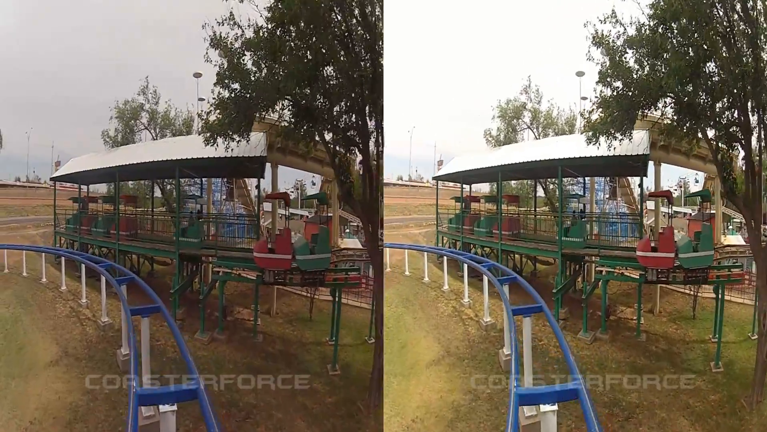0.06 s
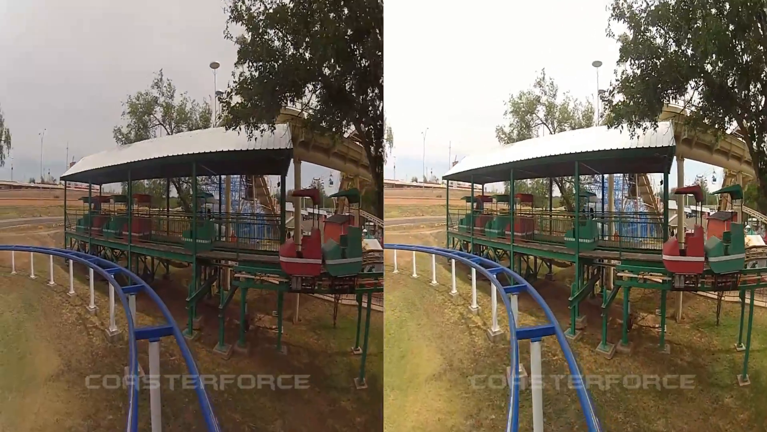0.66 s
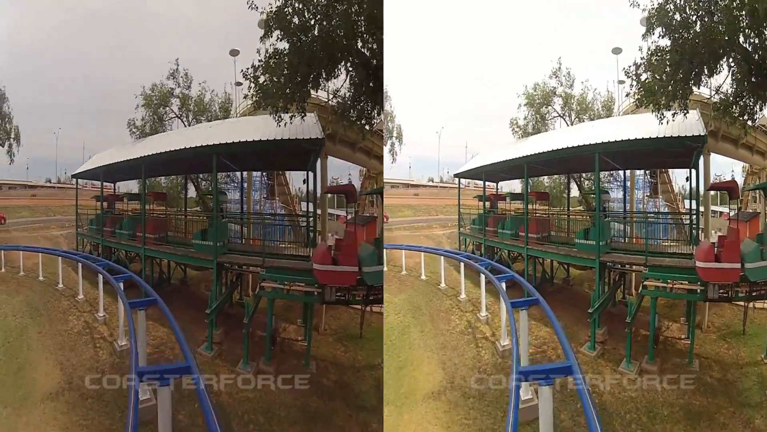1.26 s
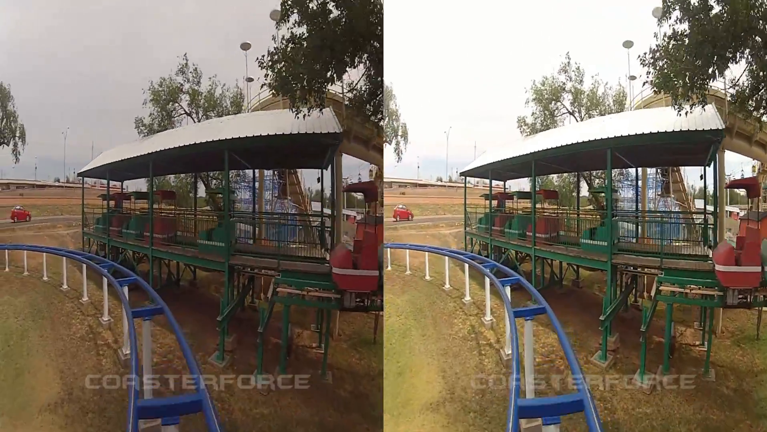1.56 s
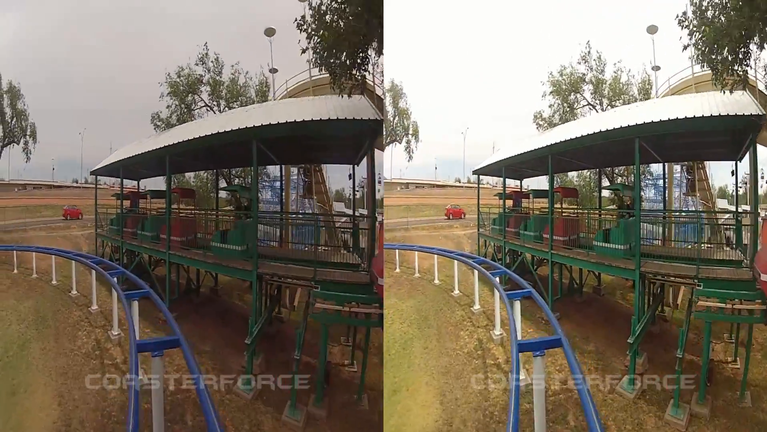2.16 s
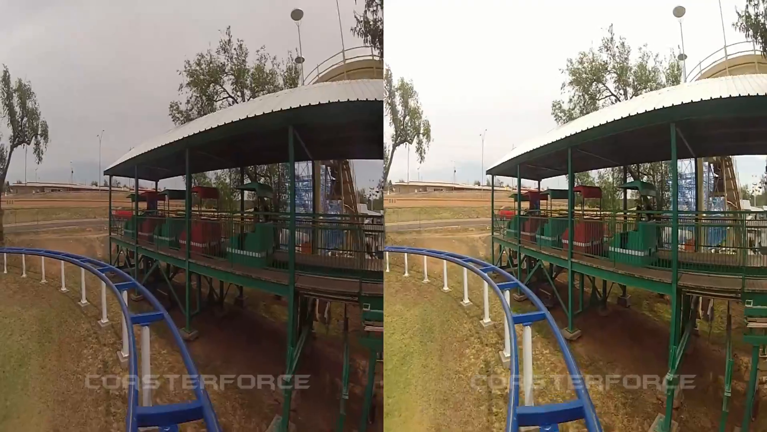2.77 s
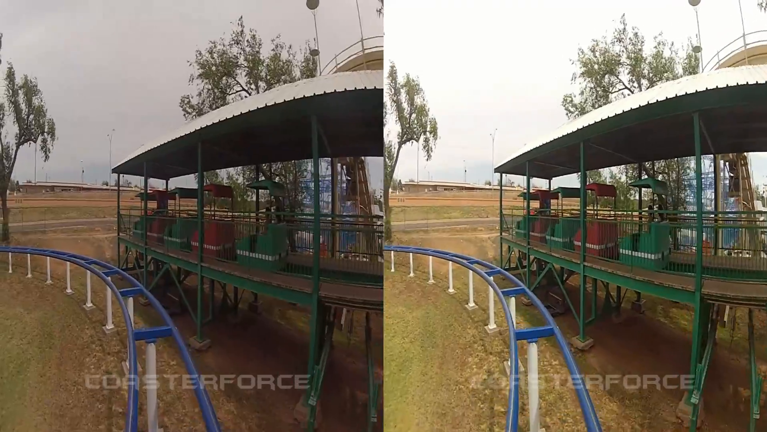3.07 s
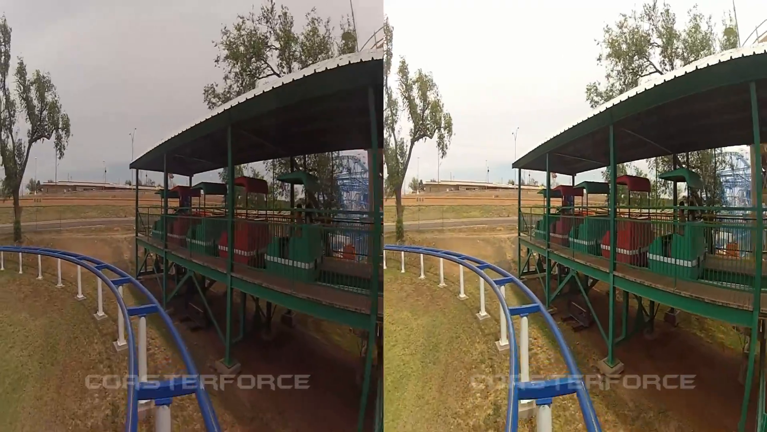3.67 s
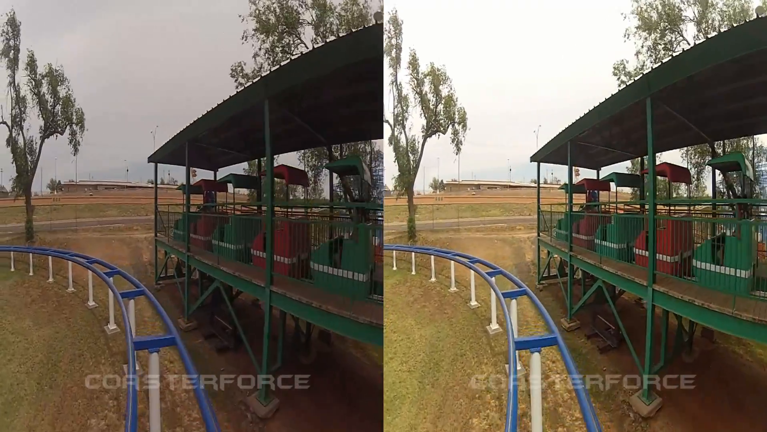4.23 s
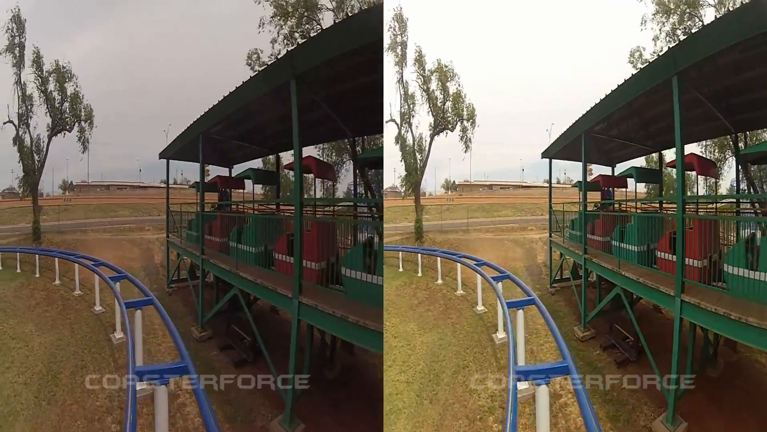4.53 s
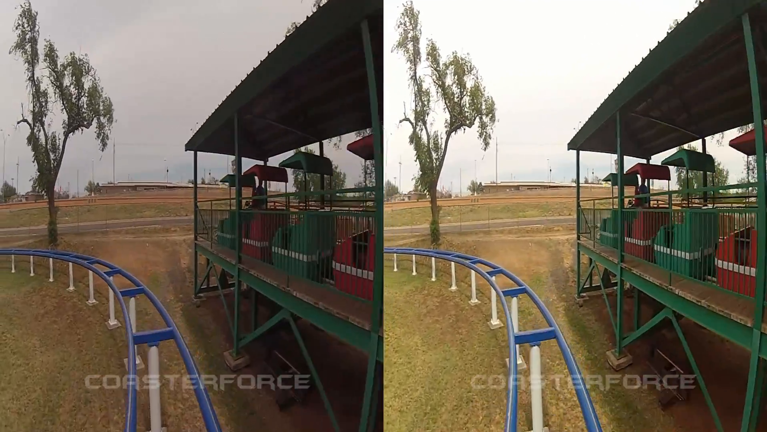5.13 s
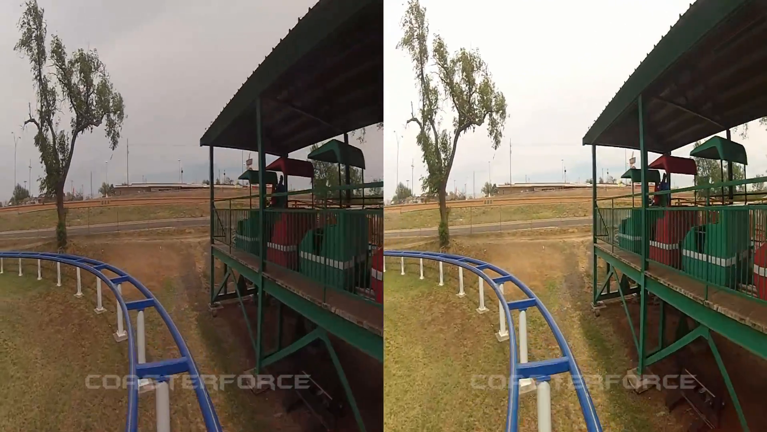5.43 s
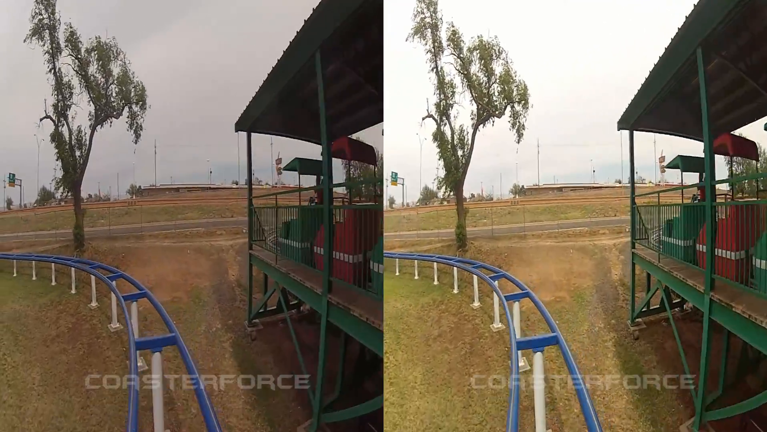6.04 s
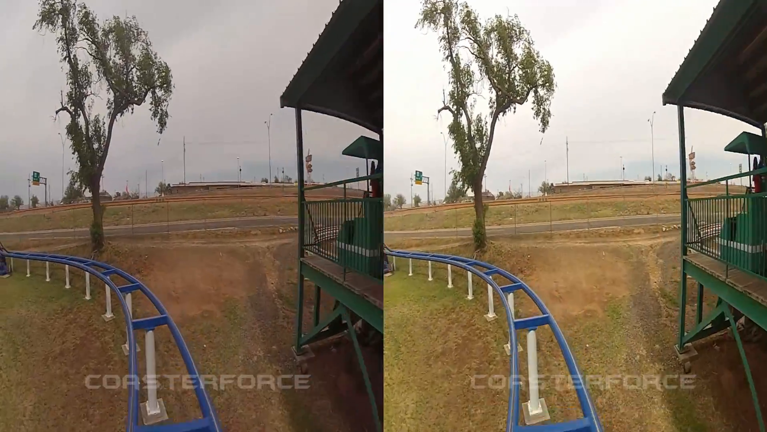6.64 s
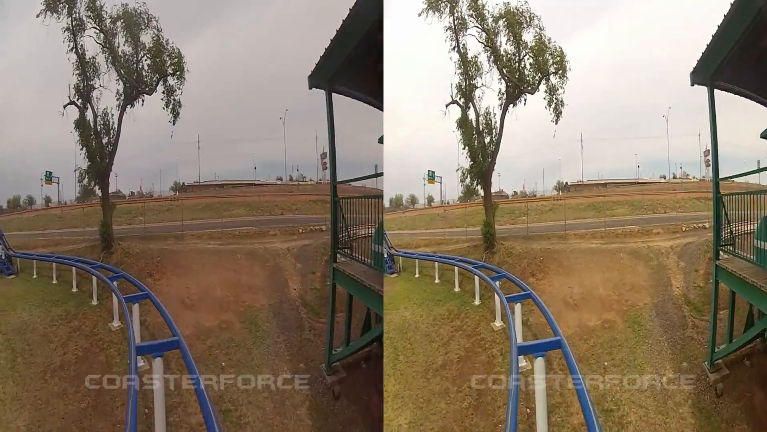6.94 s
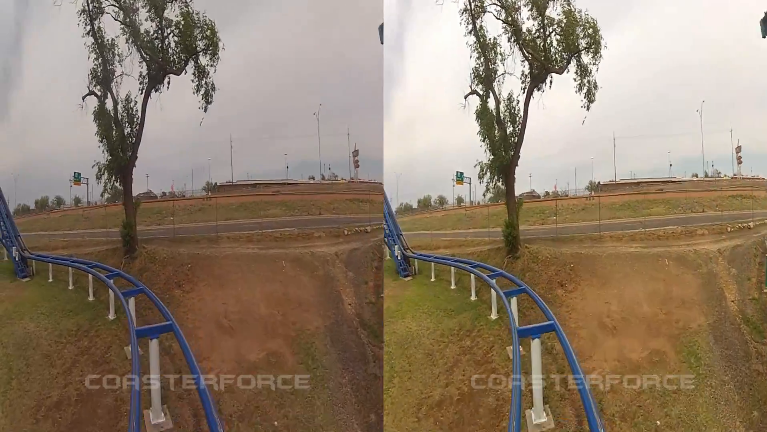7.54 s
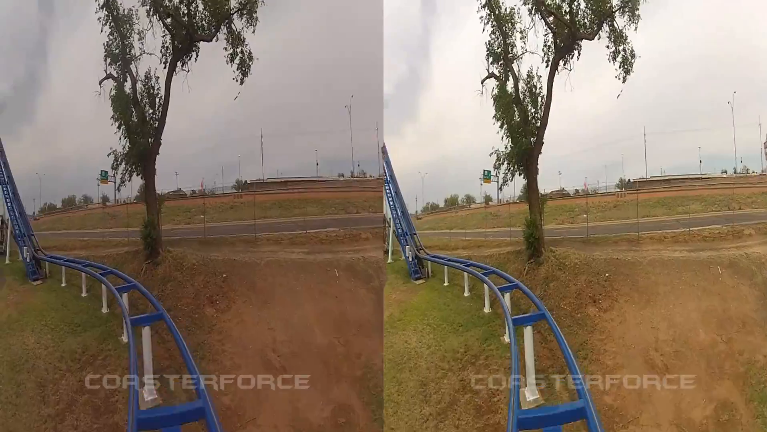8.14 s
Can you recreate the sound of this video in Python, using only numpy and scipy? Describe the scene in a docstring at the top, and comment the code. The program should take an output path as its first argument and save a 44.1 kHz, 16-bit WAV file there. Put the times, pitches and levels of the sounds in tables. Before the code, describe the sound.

A small roller coaster rounds a bend on steel track outdoors, heard from its front car. It begins with a low, subdued rumble and light, quick wheel taps. After about two seconds it runs harder and louder: the wheels roar and rasp in surges, one squeals faintly for a moment, and a loose fitting chatters in short clacks. The bumpy rumble carries on to the end, with a few sharp ticks and a thin fizz.

```python
"""Roller coaster in a bend

A small train rounds steel track, heard from its front car. The wheels drive the car's low modes and the
roar, rasp and hiss of the rails; bearings whir, and wheel carriers tap while the train is slow.
From 2 s it runs harder: a flange sings faintly and a loose fitting chatters in short clacks.
Overload flattens peaks, dropouts tick and timing jitter adds a thin fizz."""
import sys
import numpy as np
from scipy import signal
from scipy.fft import rfft, irfft
from scipy.io import wavfile
from scipy.ndimage import uniform_filter1d

SR = 44100
rng = np.random.default_rng(int(sys.argv[2]) if len(sys.argv) > 2 else 0)


def master_out(mix):
    """Clip the mix to full scale and print it as 16-bit PCM to the path in sys.argv[1]."""
    frames = np.transpose(np.atleast_2d(mix))
    ceiling = np.clip(frames, -1, 1)
    pcm = np.round(ceiling * 32767).astype(np.int16)
    wavfile.write(sys.argv[1], SR, pcm)


N = 370440
CEILING_DB = -1.95


def amp(db):
    """Gain from dB."""
    return 10 ** (np.asarray(db) / 20)


def unit_rms(x):
    """Scale to rms 1."""
    return x / np.sqrt(np.mean(x ** 2) + 1e-20)


def bin_hz():
    """FFT bin frequencies."""
    return np.fft.rfftfreq(N, 1 / SR)


def spectrum(points):
    """Gain per bin through points of f/Hz, level/dB."""
    hz, db = np.transpose(points)
    return amp(np.interp(np.log(bin_hz() + 1), np.log(hz), db))


def modes(rows):
    """Gain per bin of steep-sided resonances: f/Hz, width/Hz, level/dB."""
    f = bin_hz()
    return np.sqrt(sum(amp(db) ** 2 / (1 + 2 * ((f - hz) / width) ** 2) ** 2 for hz, width, db in rows))


def band(lo_hz, hi_hz):
    """Gain per bin of a steep band-pass."""
    f = bin_hz() + 1
    return 1 / np.sqrt((1 + (lo_hz / f) ** 20) * (1 + (f / hi_hz) ** 20))


def noise(gain):
    """Unit-rms noise shaped by a gain per bin."""
    return unit_rms(irfft(gain * rfft(rng.standard_normal(N)), N))


def steadied(x, window_s):
    """Hold the slow level at 1; keep the quick beating."""
    size = max(int(window_s * SR), 2)
    power = uniform_filter1d(uniform_filter1d(x ** 2, size), size)
    return x / np.sqrt(abs(power) + 1e-9)


def add(mix, start_s, sound):
    """Mix a sound in at start_s."""
    part = mix[max(round(start_s * SR), 0):][:len(sound)]
    part += sound[:len(part)]


def swell(centre_s, length_s):
    """Hann pulse, 0 to 1 and back."""
    out, size = np.zeros(N), max(int(length_s * SR), 3)
    start = round(centre_s * SR) - size // 2
    add(out, start / SR, np.hanning(size)[max(-start, 0):])
    return out


# Wheel load on the rails: t/s, level/dB
WHEEL_LOAD = [(0, -15.5), (0.55, -16), (0.85, -12), (1.55, -9.0), (1.88, -13), (2.02, -3.5), (2.45, -4.5),
              (2.83, -6), (3.2, -4.0), (4.0, -3), (4.55, -0.5), (5.6, -0.5), (6.7, 0), (7.0, 2.5),
              (7.5, -0.5), (8.4, -1)]


def load_db():
    """The wheels bear harder as the run goes on."""
    return np.interp(np.arange(N) / SR, *np.transpose(WHEEL_LOAD))


# Rough stretches of rail: centre t/s, length/s, rise/dB
ROUGH_RAIL = [(0.12, 0.18, 7), (2.15, 0.13, 5), (2.338, 0.27, 5.5), (2.538, 0.079, 2.5), (2.682, 0.25, 6.0),
              (2.909, 0.12, 9.0), (2.978, 0.17, 11.0), (3.118, 0.2, 8), (3.3, 0.14, 7), (3.366, 0.1, 4),
              (3.52, 0.14, 7.5), (3.648, 0.051, 6), (3.724, 0.034, 9.5), (3.83, 0.16, 5),
              (3.926, 0.096, 10.5), (4.17, 0.2, 5.5), (4.341, 0.049, 4.5), (4.46, 0.5, 3.5),
              (4.628, 0.05, 6), (4.982, 0.19, 4.0), (5.19, 0.21, 3.0), (5.384, 0.05, 3.5),
              (6.21, 0.072, 7.5), (6.846, 0.21, 2.5), (7.11, 0.07, 3.5), (7.667, 0.063, 9),
              (7.719, 0.087, 10.5), (7.803, 0.058, 9), (7.967, 0.21, 2.5), (8.37, 0.17, 3)]


def roughness_db():
    """Rough rail briefly makes the wheels grind louder."""
    return sum(db * swell(s, length_s) for s, length_s, db in ROUGH_RAIL)


# Modes of the car on the track: f/Hz, width/Hz, relative level/dB
CAR_MODES = [(24, 5.9, -23.5), (45.3, 5.1, -1.5), (69.9, 7.9, 4), (80.6, 8.8, 2), (107, 15, -15.5),
             (113.6, 13, 2), (141.9, 10, 2), (171.8, 12, -4), (188.3, 18, -6), (213.5, 11, -3.5),
             (227.8, 21, -10.5), (269, 93, -22.5)]
# Mode groups, slow sway to frame buzz: low f/Hz, high f/Hz
MODE_GROUPS = [(16, 55), (55, 95), (95, 130), (130, 154), (154, 300)]
# Response per group: level/dB at 0 dB load, slope/(dB/dB), random swell/dB
GROUP_RESPONSE = [(-22.5, 0, -1), (-15, 0.4, 2), (-17, 0.5, 2), (-18, 0.75, 2), (-17, 0.59, 1.84)]
# Track bumps: centre t/s, length/s, f/Hz (selects the group), rise/dB
BUMPS = [(0.11, 0.16, 42, 12.5), (1.05, 0.15, 116, 13.5), (1.492, 0.56, 42, 6), (2.307, 0.12, 190, 9.5),
         (2.48, 0.31, 42, 7), (2.66, 0.19, 116, 8), (2.738, 0.59, 42, 10.5), (2.902, 0.13, 190, 8.5),
         (2.924, 0.15, 116, 15), (3.003, 0.11, 142, 11.5), (3.09, 0.18, 116, 12), (3.264, 0.81, 190, 6.0),
         (3.514, 0.2, 116, 11), (3.663, 0.25, 75, 7.0), (3.838, 0.42, 116, 11), (3.948, 0.14, 75, 5.0),
         (4.194, 0.48, 190, 4.5), (4.423, 0.2, 116, 7.5), (4.6, 0.74, 75, 5.5), (4.956, 0.14, 142, 11.5),
         (5.15, 0.18, 75, 3.5), (5.222, 0.42, 190, 7), (5.63, 0.4, 75, 3.5), (6.07, 0.13, 75, 7),
         (6.122, 0.39, 190, 1), (6.225, 0.5, 142, 11), (6.376, 0.16, 75, 6.5), (6.586, 0.13, 75, 8),
         (6.79, 0.19, 142, 8.5), (7.075, 0.29, 142, 7.5), (7.335, 0.17, 75, 5.0), (7.688, 0.18, 142, 11),
         (7.737, 0.44, 190, 4), (8.224, 0.6, 116, 7)]


def rumble():
    """Uneven track shakes the car; each mode group swells on its own, most at the bumps."""
    body, load, out = modes(CAR_MODES), load_db(), np.zeros(N)
    for (lo_hz, hi_hz), (db, slope, swell_db) in zip(MODE_GROUPS, GROUP_RESPONSE):
        bump_db = sum(rise * swell(s, length_s) for s, length_s, hz, rise in BUMPS if lo_hz <= hz < hi_hz)
        wander_db = swell_db * noise(band(2.7, 6.54)) * amp(-1.2 * bump_db)
        vibration = steadied(noise(body * band(lo_hz, hi_hz)), window_s=0.09)
        out += amp(db + slope * load + bump_db + wander_db) * vibration
    return out


# Wheel roar spectrum: f/Hz, relative level/dB
ROAR_SPECTRUM = [(150, -26.5), (260, 6.5), (335, -2.5), (400, 1), (510, -3), (590, -1.5), (700, -5.5),
                 (755, -0.5), (900, -5.5), (980, -14), (1300, -39.5), (4000, -70.5)]
# Modes of rails and wheel carriers: f/Hz, width/Hz, relative level/dB
STEEL_MODES = [(1128, 100, 5.5), (1307, 120, 5.5), (1610, 160, 5), (1840, 170, -0.5), (2100, 140, -14.5),
               (2406, 160, -8.5), (2660, 120, -11), (2900, 83, -18)]
# Tread hiss spectrum: f/Hz, relative level/dB
HISS_SPECTRUM = [(500, -32), (1000, -12), (2000, -14), (3000, -16), (4400, -22.5), (5300, -50), (7000, -38),
                 (9000, -21), (14000, -27), (16000, -47.5)]


def rolling(grind_db, rasp_gain):
    """Rough treads roar, hiss and make the steel rasp in quick surges; pressure brightens the roar."""
    roar_gain, hiss_gain = amp(-27 + 0.81 * grind_db), amp(-51.5 + grind_db)
    surge = noise(band(5, 39))
    hardness = np.clip(roar_gain / amp(-28.5), 0, 1)
    dull = noise(spectrum(ROAR_SPECTRUM) / (1 + (bin_hz() / 620) ** 2))
    bright = noise(spectrum(ROAR_SPECTRUM))
    blend = np.sqrt(1 - hardness) * dull + np.sqrt(hardness) * bright
    roar = steadied(blend, window_s=0.16) * unit_rms(amp(1.6 * surge))
    ring, grain = noise(modes(STEEL_MODES)), noise(band(40, 200))
    rasp = ring * unit_rms(amp(2.2 * surge + 2.0 * grain))
    hiss = noise(spectrum(HISS_SPECTRUM)) * unit_rms(amp(2.6 * surge))
    return roar_gain * roar + rasp_gain * rasp + hiss_gain * hiss


# Wheel bearing resonances: f/Hz, width/Hz, relative level/dB
BEARING_MODES = [(2890, 80, 0), (2570, 250, -5.5), (3660, 270, -12.5)]


def whir():
    """The wheel bearings turn with a thin, steady whir."""
    return amp(-64) * noise(modes(BEARING_MODES))


# Airborne noise spectrum: f/Hz, relative level/dB
AIR_SPECTRUM = [(40, 25), (150, 15.5), (350, -3.5), (700, -14.5), (2500, -4), (4000, -5.5), (5500, -23),
                (12000, -5.5), (15000, -20), (16000, -35.5)]


def airborne(rasp_gain):
    """A little noise arrives through the air, following the rasp."""
    return amp(-13.5) * rasp_gain * noise(spectrum(AIR_SPECTRUM))


# Hard taps of the wheel carriers: t/s, level/dB
HARD_TAPS = [(0.075, -37), (0.1327, -37), (0.42, -35), (0.7495, -42), (0.8754, -35), (1.3523, -35),
             (1.5329, -32)]


def taps(until_s=1.65, rate_hz=52, light_db=-48, rise_s=0.00085):
    """Wheel carriers tap unevenly while the train is slow; the steel rings for a few milliseconds."""
    blows, t = np.zeros(N), np.arange(SR // 30) / SR
    envelope = t / rise_s * np.exp(1 - t / rise_s)
    ring = steadied(noise(modes(STEEL_MODES[:4])), window_s=0.005)
    light_taps = [(0.06 + (k + 0.35 * late) / rate_hz, light_db + spread_db)
                  for k, (late, spread_db) in enumerate(rng.standard_normal((120, 2)))]
    for s, db in light_taps + list(HARD_TAPS):
        if s < until_s:
            add(blows, s, amp(db) * envelope)
    return blows * ring


# Dropout ticks: t/s, relative level/dB
TICKS = [(0.1525, -13), (0.204, -12.5), (1.1645, -16), (2.087, 2), (2.125, 7), (3.0543, -15), (3.1052, -3),
         (4.0655, -13.5), (4.989, -7.5), (5.0254, 12.2), (5.9566, -8), (6.0069, -2.5), (6.9669, 6),
         (7.8911, -5), (7.9266, 2)]


def ticks(x, decay_s=0.00049, swing_hz=480):
    """Dropout ticks: sharp clicks where the sound suddenly jumps."""
    out, t = np.zeros(N), np.arange(SR // 50) / SR
    step = np.exp(-t / decay_s) * np.cos(2 * np.pi * swing_hz * t)
    for s, db in TICKS:
        size = min(amp(db - 8.5), 2 * amp(CEILING_DB))  # full range at most
        add(out, s, -np.sign(x[round(s * SR)]) * size * step)
    return out


# Flange tones: f/Hz, width/Hz, resting level/dB
FLANGE_MODES = [(2676, 45, -71.5), (3750, 58, -79)]
# Squeals: centre t/s, length/s, low tone level/dB, high tone level/dB
SQUEALS = [(2.08, 0.3, -74, -75), (2.367, 0.068, -52, -58), (2.494, 0.12, -53, -72),
           (2.603, 0.15, -52, -55.5), (2.735, 0.18, -53, -59), (2.977, 0.19, -50, -59),
           (3.36, 0.25, -67, -72)]


def squeal(chirr_hz=44, chirr_depth=0.6, scrape_db=-11.5):
    """A flange grips and slips on the outer rail in a quick chirr, scraping and exciting two modes."""
    grip = unit_rms(amp(1.8 * noise(band(11, 35))))
    slip_cycles = np.cumsum(chirr_hz * (1 + 0.16 * noise(band(2, 16)))) / SR
    chirr = unit_rms(1 + chirr_depth * np.cos(2 * np.pi * slip_cycles))
    scrape = amp(scrape_db) * noise(band(3100, 4900))
    out = np.zeros(N)
    for k, (hz, width_hz, rest_db) in enumerate(FLANGE_MODES):
        contact = sum(amp(db[k]) * np.sqrt(swell(s, length_s)) for s, length_s, *db in SQUEALS)
        tone = steadied(noise(modes([(hz, width_hz, 0)])), window_s=0.024)
        out += (amp(rest_db) + contact) * (tone + scrape)
    return grip * chirr * out


# Modes of the loose fitting: f/Hz, relative level/dB
FITTING_MODES = [(600, 0.5), (1160, -3.5), (1590, -6.5), (1870, 1.5), (2110, -9.5), (2430, -16),
                 (2640, -17.5)]


def clack(draws, length_s, detune, grit_db):
    """The fitting buzzes briefly against its seat; draws (0 to 1) set each mode's tuning and phase."""
    t = np.arange(int(length_s * SR)) / SR
    ring = sum(amp(db) * np.sin(2 * np.pi * (hz * (1 + detune * (2 * tuning - 1)) * t + phase))
               for (hz, db), tuning, phase in zip(FITTING_MODES, *draws))
    grit_filter = signal.butter(4, [2200, 4500], "bandpass", fs=SR, output="sos")
    grit = signal.sosfilt(grit_filter, rng.standard_normal(SR // 20))[-len(t):]
    envelope = np.sin(np.pi * (t / length_s) ** 0.71) ** 2  # rise quicker than fall
    return (ring + amp(grit_db) * unit_rms(grit)) * envelope


# Loud clacks: peak t/s, relative level/dB, grit level/dB within the clack
LOUD_CLACKS = [(2.1621, -14.5, -28), (2.702, -20, -33), (3.1665, -22, -31), (3.174, -20.5, -29),
               (3.2971, -26, -37), (3.318, -42, -29), (3.37, -22, -24), (3.5309, -26, -35),
               (3.5608, -18.5, -23.5), (3.6347, -27.5, -22), (3.8904, -25, -32), (4.157, -18.5, -19.5),
               (4.5932, -25, -27), (5.1453, -29.5, -28), (5.217, -28, -29), (5.677, -44, -30),
               (5.7385, -25, -37), (5.8547, -24, -39), (6.2033, -30, -26), (6.2296, -22, -34),
               (6.3771, -30.5, -22), (6.4373, -26.5, -25), (6.4707, -26, -37), (6.559, -18.5, -21),
               (6.6014, -25.5, -33), (6.82, -30.5, -25), (6.894, -23.5, -29), (7.026, -25, -32),
               (7.1186, -18, -23.5), (7.253, -24, -39), (7.502, -22.5, -22), (7.68, -17, -29.5),
               (7.707, -31, -16), (7.7185, -17.5, -24), (7.7268, -17, -29), (7.8279, -17, -21),
               (7.8405, -16, -23), (7.9698, -26, -24)]


def chatter(rasp_gain, loud_length_s=0.0105, light_rate_hz=8, candidates=120):
    """Hard jolts clack the loose fitting; light random clacks follow the rasp in level."""
    out, mode_count = np.zeros(N), len(FITTING_MODES)
    for (s, db, grit_db), draws in zip(LOUD_CLACKS, rng.random((len(LOUD_CLACKS), 2, mode_count))):
        loud = clack(draws, loud_length_s, detune=0.02, grit_db=grit_db)
        add(out, s - 0.4 * loud_length_s, amp(db + 1) * loud)
    for place, size, chance in rng.random((candidates, 3)):
        light = clack(rng.random((2, mode_count)), length_s=0.0078, detune=0.041, grit_db=-20)
        if chance < light_rate_hz * N / SR / candidates:
            gain = amp(-9.5 + 7.3 * size ** 2) * rasp_gain[int(place * N)]
            add(out, place * N / SR, gain * light)
    return out


def scene():
    """Sound through the car's frame is alike in both channels; only the airborne noise differs."""
    grind_db = load_db() + roughness_db()
    rasp_gain = amp(-38.5 + 1.095 * grind_db)
    frame = rumble() + rolling(grind_db, rasp_gain) + squeal() + whir() + taps() + chatter(rasp_gain)
    air = airborne(rasp_gain)
    return np.array([frame + air, frame - air])


def record(dry, clock_hz=12000, beat_hz=8100, cutoff_hz=15700):
    """Overload flattens peaks, dropouts tick; periodic timing jitter mirrors the sound into a fizz."""
    ceiling, t = amp(CEILING_DB), np.arange(N) / SR
    rounded = dry / (1 + (dry / ceiling) ** 14) ** (1 / 14)  # short knee
    clipped = np.clip(rounded + ticks(rounded[0]), -ceiling, ceiling)
    slope = signal.lfilter(*signal.butter(3, 3000, fs=SR), np.gradient(rounded, axis=1))
    jitter_samples = amp(0.5) * np.cos(2 * np.pi * clock_hz * t)
    jitter_samples += amp(-19) * np.cos(2 * np.pi * beat_hz * t)
    fizz = slope * jitter_samples
    lowpass = signal.firwin(127, cutoff_hz, window=("kaiser", 8), fs=SR)
    return signal.oaconvolve(clipped + fizz, lowpass[None], "same", axes=1)


dry = scene()
out = record(dry)
master_out(out)
```